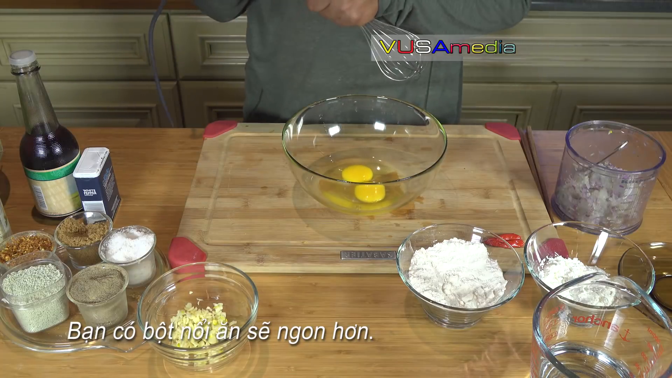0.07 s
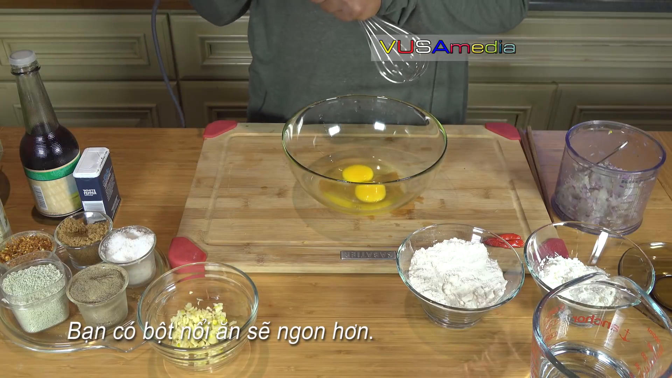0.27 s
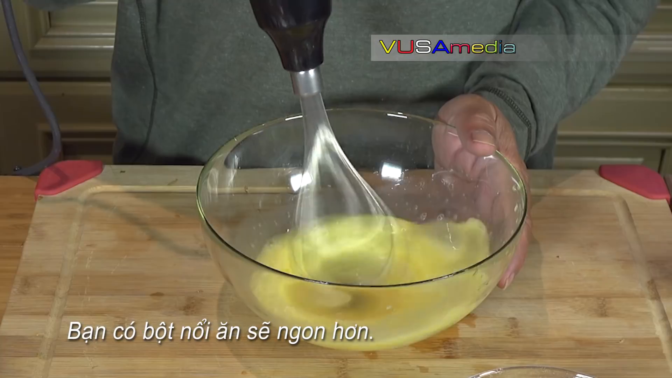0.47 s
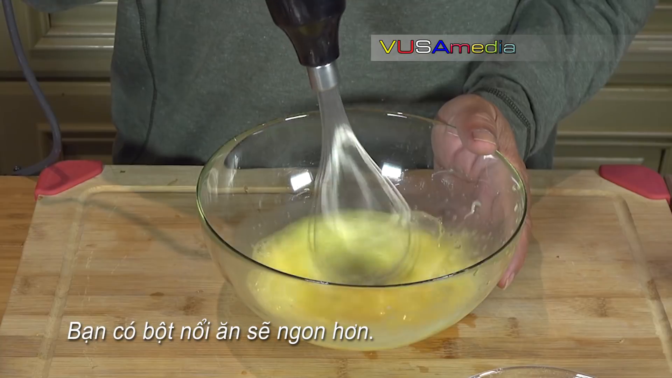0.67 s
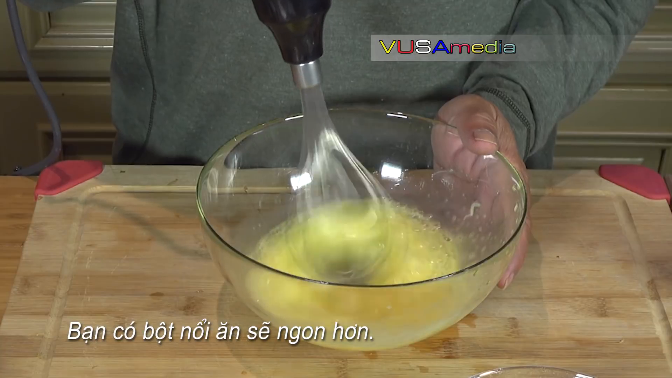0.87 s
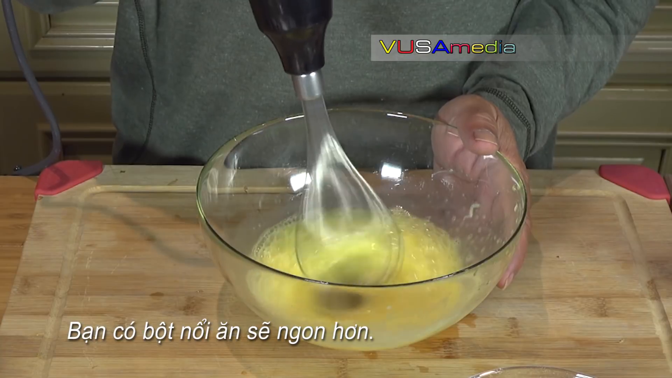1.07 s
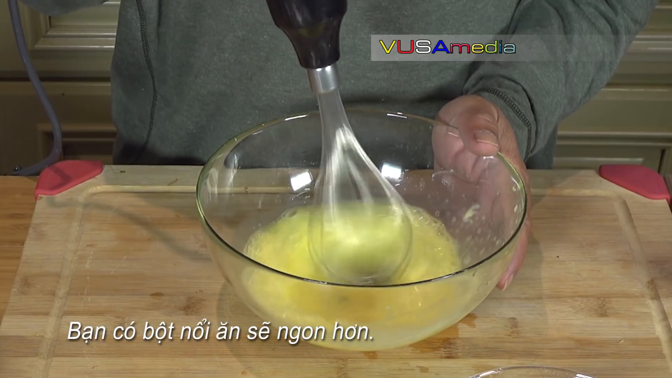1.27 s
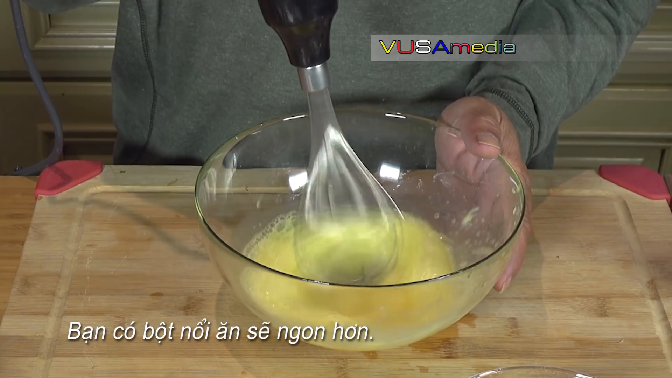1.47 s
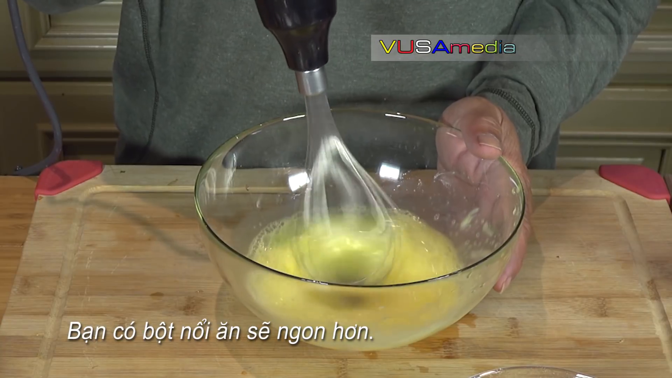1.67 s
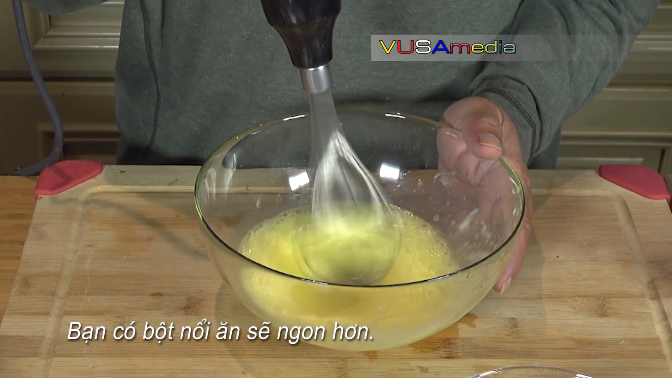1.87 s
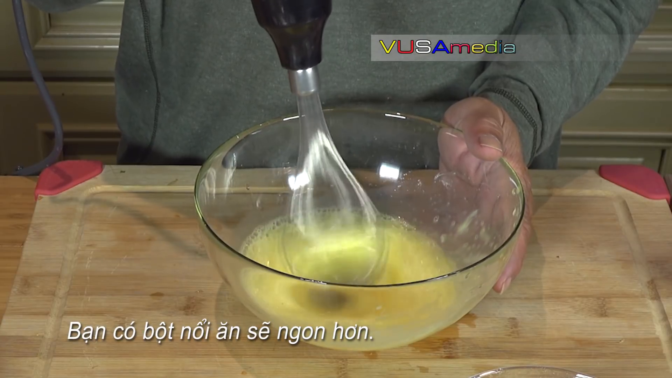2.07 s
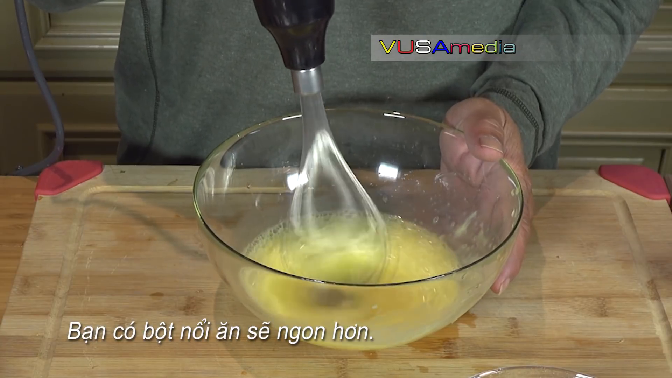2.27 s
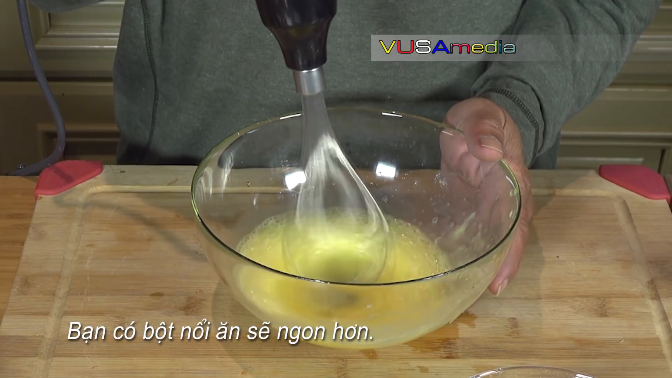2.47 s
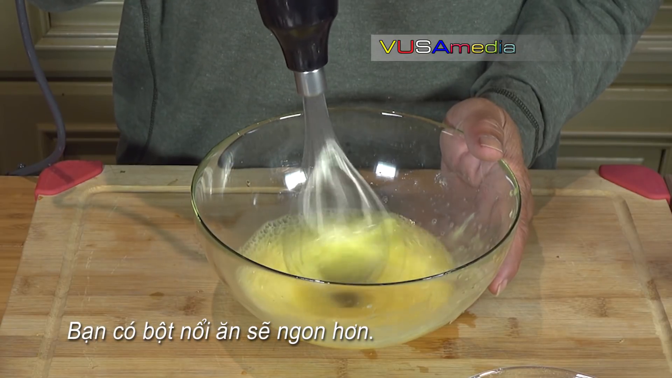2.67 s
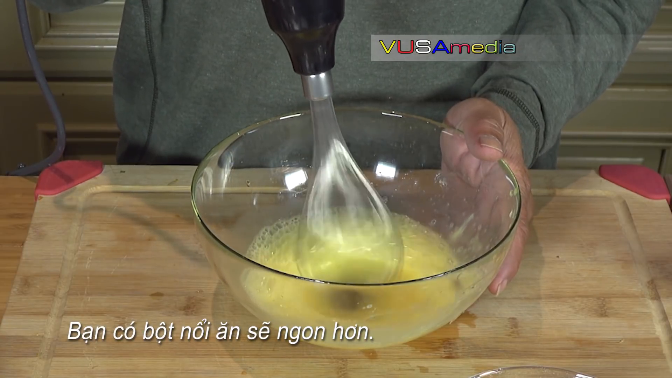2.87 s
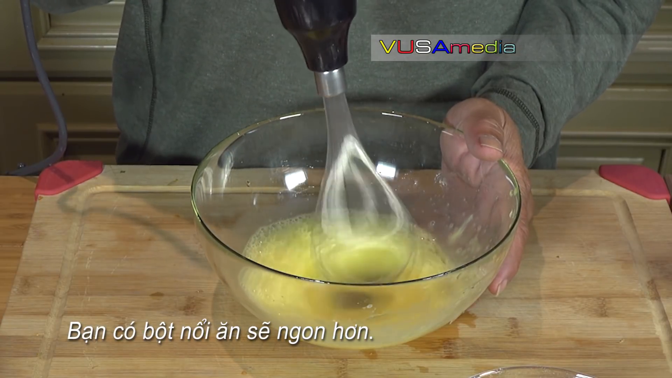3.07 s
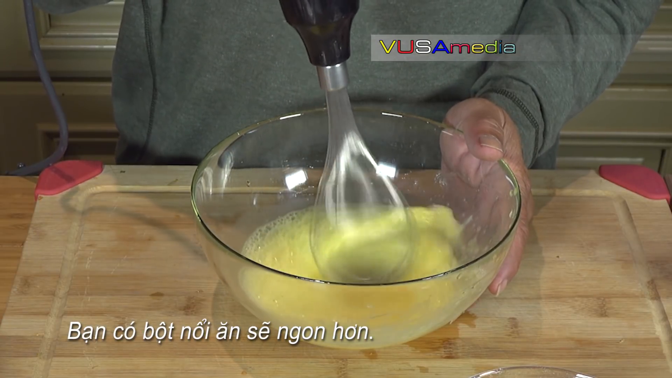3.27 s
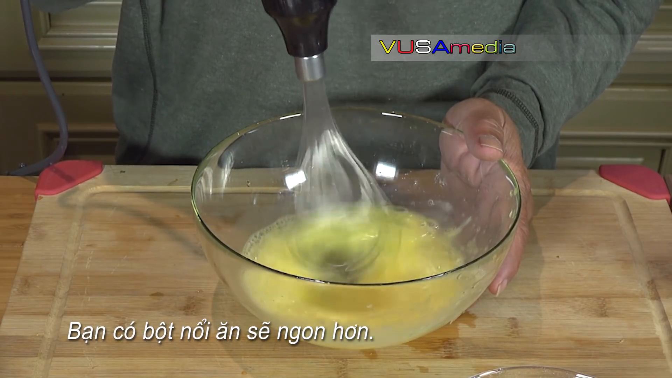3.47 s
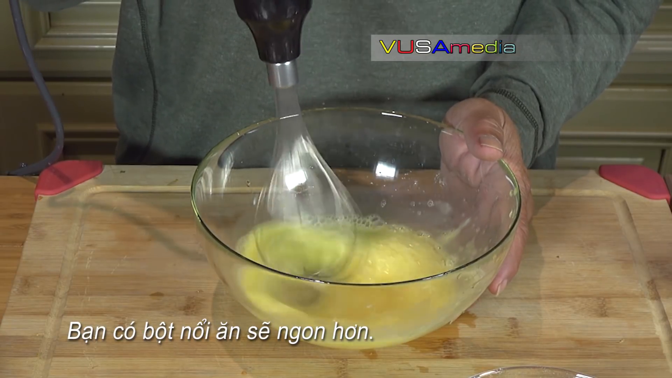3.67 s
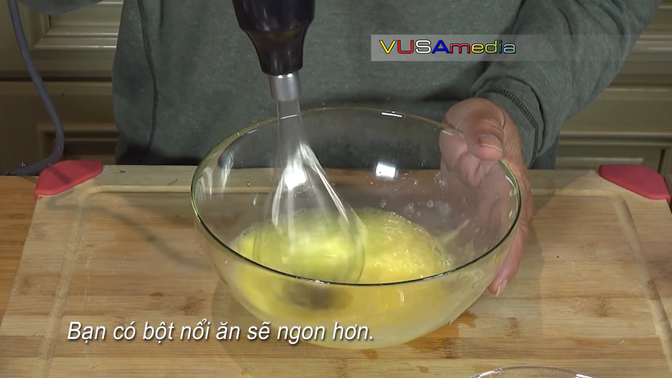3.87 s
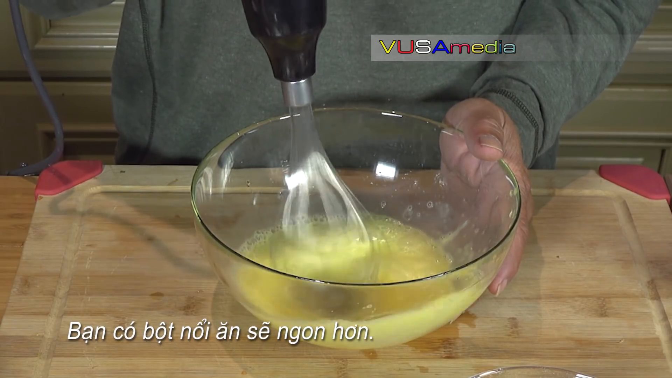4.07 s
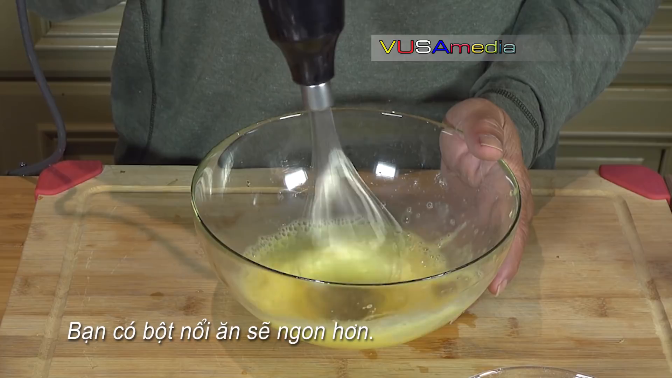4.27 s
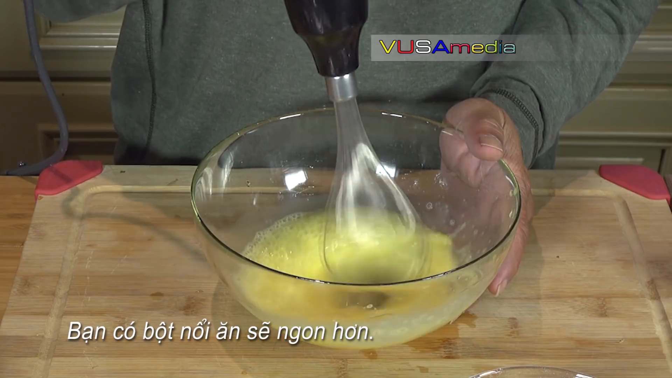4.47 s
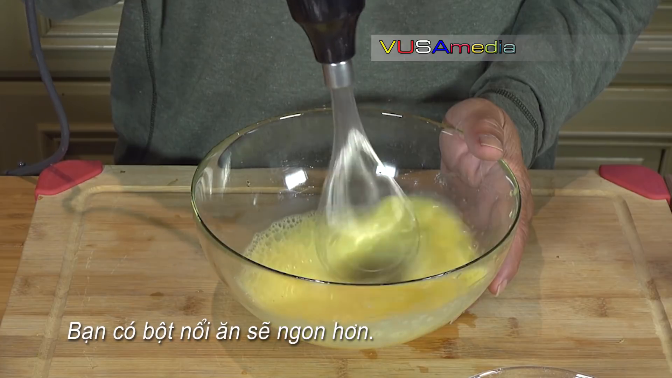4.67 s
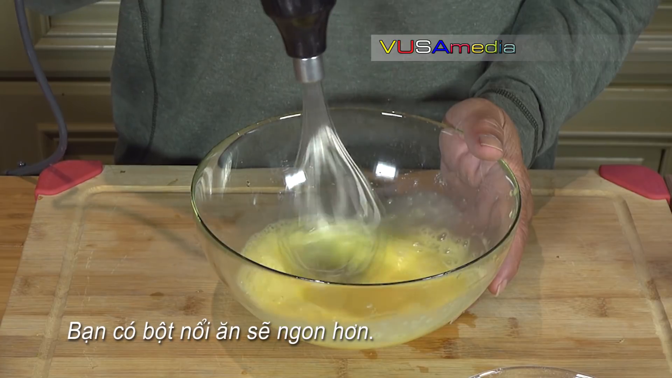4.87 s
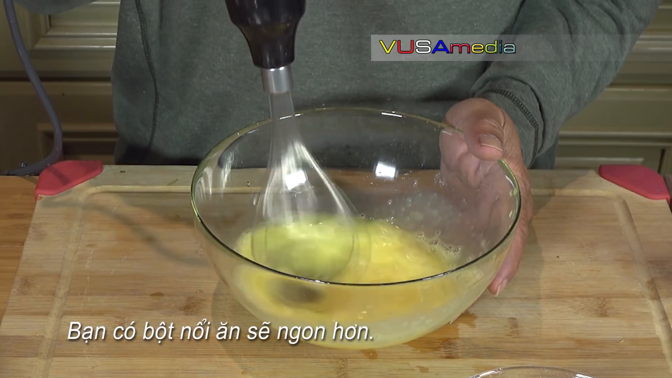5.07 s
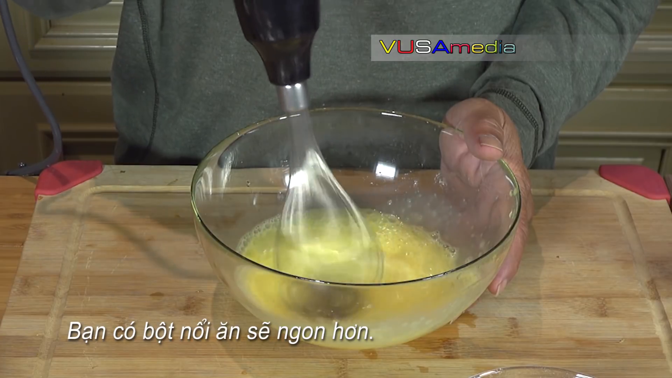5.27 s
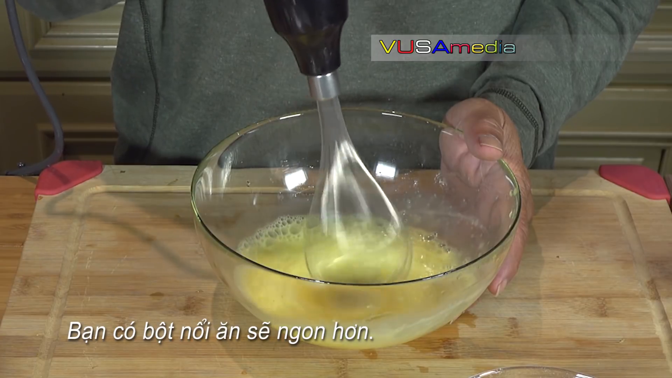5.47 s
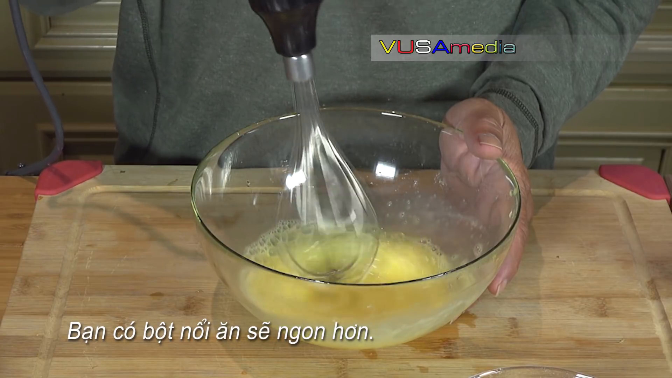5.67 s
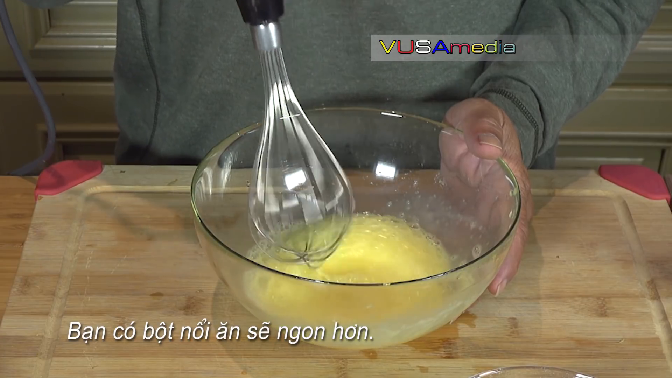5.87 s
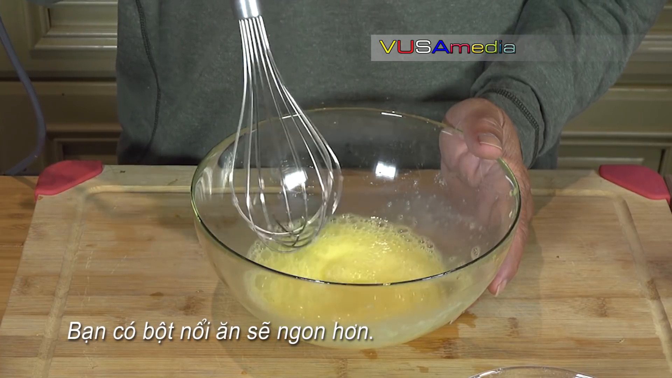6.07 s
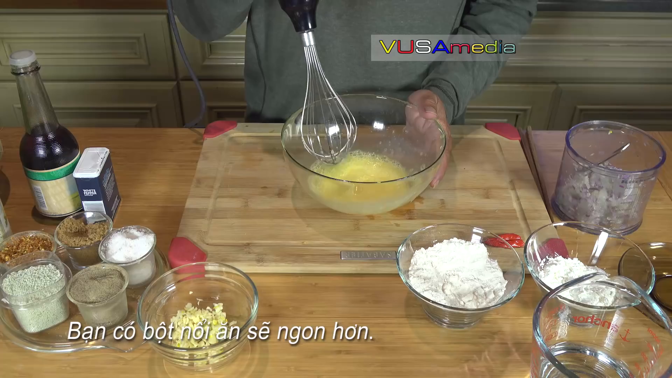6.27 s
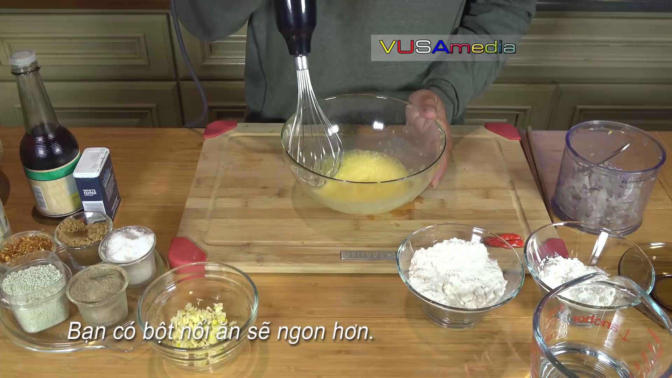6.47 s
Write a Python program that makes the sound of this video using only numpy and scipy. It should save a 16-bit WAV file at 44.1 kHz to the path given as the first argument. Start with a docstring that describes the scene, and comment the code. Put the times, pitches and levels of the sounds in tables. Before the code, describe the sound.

A quick cluster of latching clicks with a short metallic ring comes first. Then an electric whisk whirs steadily, buzzing and fluttering as wires beat eggs in a glass bowl, with tiny squeaks and dull bumps. The drive slows for a moment, picks up again, and finally slides down in pitch to a stop. Close, bright and fairly dry, with slight kitchen reflections and faint low hum.

```python
"""A whisk attachment snaps onto a hand blender in a kitchen: short noise bursts and ringing modes.
The motor then runs up and beats eggs in a glass bowl: ten wires fling shaped noise on every turn,
while gear teeth rattle a resonant housing and the drive whines; wires squeak, the bowl bumps.
The motor sags once as the button is let go, picks up again and finally coasts to a stop.
Soft room tone with hum lies beneath, quieter from when the whirr is heard until just after the stop."""
import sys
import numpy as np
from scipy import signal
from scipy.fft import rfft, irfft
from scipy.io import wavfile
from scipy.ndimage import uniform_filter1d

SR = 44100
rng = np.random.default_rng(int(sys.argv[2]) if len(sys.argv) > 2 else 0)


def to_wav(s):
    """Save 16-bit WAV."""
    ch = np.atleast_2d(s).T  # columns
    pcm = np.round(np.clip(ch, -1, 1) * 32767)  # PCM
    wavfile.write(sys.argv[1], SR, pcm.astype(np.int16))


N = 287532
T = np.arange(N) / SR
FULL_SPEED_TURNS_PER_S = 13.83


def from_db(db):
    """Decibels to gain."""
    return 10 ** (np.asarray(db) / 20)


def rms_one(x):
    """Scale to unit power."""
    return x / np.sqrt(np.mean(x ** 2) + 1e-20)


def in_time(rows):
    """Each column of a curve, interpolated sample by sample."""
    s, *columns = np.transpose(rows)
    return [np.interp(T, s, c) for c in columns]


def drift(rate_hz):
    """Smooth random drift, unit power, with rate_hz new values per second."""
    return rms_one(np.interp(T * rate_hz, np.arange(8000), rng.standard_normal(8000)))


def coloured(x, spectrum):
    """Weight x by a spectrum, interpolated over log frequency; unit power."""
    hz, db = np.transpose(spectrum)
    bins_hz = np.maximum(np.fft.rfftfreq(N, 1 / SR), 1)
    gain = from_db(np.interp(np.log(bins_hz), np.log(hz), db))
    return rms_one(irfft(rfft(x) * gain, N))


def resonate(x, hz, width_hz):
    """Two-pole resonance, about unit gain at its peak."""
    r = np.exp(-np.pi * width_hz / SR)
    zeros = np.array([1, 0, -1]) * (1 - r * r) / 2
    poles = [1, -2 * r * np.cos(2 * np.pi * hz / SR), r * r]
    return signal.lfilter(zeros, poles, x + 1e-18)


def band(x, low_hz, high_hz):
    """Causal band-pass."""
    edges_hz = [low_hz, min(high_hz, SR / 2 - 100)]
    return signal.sosfilt(signal.butter(2, edges_hz, "band", fs=SR, output="sos"), x)


def passings(position):
    """Samples at which a position passes a whole number, and that number."""
    at = np.flatnonzero(np.diff(np.floor(position)) > 0) + 1
    return at, position[at].astype(int)


def grains(per_s, spread_db):
    """Random tiny impacts of uneven size; unit power."""
    hit = rng.random(N) < per_s / SR
    size = rng.standard_normal(N) * from_db(spread_db * rng.standard_normal(N))
    return rms_one(hit * size)


def dulled(x, speed, corner_hz):
    """Treble of a contact shrinks in proportion to the speed."""
    dull = signal.sosfiltfilt(signal.butter(2, corner_hz, fs=SR, output="sos"), x)
    return dull + speed / FULL_SPEED_TURNS_PER_S * (x - dull)


def burst(db, low_hz, high_hz, decay_s):
    """Brief contact: decaying noise in one band, db at its peak."""
    t = T[:SR // 3]
    noise = band(rng.standard_normal(len(t)) * np.exp(-t / decay_s), low_hz, high_hz)
    return from_db(db) * noise / np.abs(noise).max()


def ringing(db, modes):
    """Decaying modes of a struck part."""
    t = T[:SR // 3]
    out = np.zeros(len(t))
    for hz, mode_db, t60_s in modes:
        decay = from_db(db + mode_db - 60 * t / t60_s)
        out += decay * np.sin(2 * np.pi * (hz * t + rng.random()))
    return out


def add(out, s, sound):
    """Mix a sound in at time s."""
    at = int(s * SR)
    out[at:at + len(sound)] += sound[:N - at]


# button: (pressed [s], released [s])
BUTTON_PRESSES = [(.444, 3.714), (4.025, 5.405)]
SPIN_UP_S = .025  # time constant
FRICTION_TURNS_PER_S2, EGG_DRAG_S = 12.96, 1.314  # dry friction; time constant of the drag


def whisk_speed():
    """Turns per second: exponential run-up on each press, then friction and drag brake the whisk."""
    speed = np.zeros(N)
    drag_floor = FRICTION_TURNS_PER_S2 * EGG_DRAG_S
    for pressed_s, released_s in BUTTON_PRESSES:
        lacking = FULL_SPEED_TURNS_PER_S - speed[int(pressed_s * SR)]
        since_press_s = np.maximum(T - pressed_s, 0)
        driven = FULL_SPEED_TURNS_PER_S - lacking * np.exp(-since_press_s / SPIN_UP_S)
        slowing = np.exp((released_s - T) / EGG_DRAG_S)
        coasting = (FULL_SPEED_TURNS_PER_S + drag_floor) * slowing - drag_floor
        speed = np.select([T < pressed_s, T < released_s], [speed, driven], np.maximum(coasting, 0))
    return speed


# how hard the whisk works: (time [s], level [dB])
WORK = [(0.48, -33), (0.6, -34.5), (0.9, -32.5), (1.1, -33.5), (1.9, -31.5), (2.2, -33.5), (2.75, -35),
        (3.4, -35.5), (3.72, -31.0), (4.08, -31.5), (4.2, -36.5), (4.4, -33), (4.65, -34.0), (4.85, -31.5),
        (5.2, -32.5), (5.31, -39), (5.42, -32)]
USUAL_WORK_DB = -33
# below this speed the wires only stir; softness of the change
FLING_TURNS_PER_S, FLING_SOFTNESS_TURNS_PER_S = 8.22, 0.36


def loudness(speed, usual_db, work_share, speed_power, stirring_loss_db):
    """Layer level in dB: follows work and a power of speed, drops once the whisk only stirs."""
    work_db, = in_time(WORK)
    speed_db = 20 * np.log10(speed / FULL_SPEED_TURNS_PER_S + 1e-6)
    stirring = .5 - .5 * np.tanh((speed - FLING_TURNS_PER_S) / FLING_SOFTNESS_TURNS_PER_S)
    worked_db = usual_db + work_share * (work_db - USUAL_WORK_DB)
    return worked_db + speed_power * speed_db - stirring_loss_db * stirring


# how far off centre the whisk is held: (time [s], scale of the throb [dB])
LEAN = [(.6, 8.5), (1.3, 8), (2.6, 5), (3.35, 6), (3.95, 15), (4.2, 5), (4.75, 6), (5.05, 12.5), (5.4, 7.5),
        (5.63, 6.5), (5.8, 4)]


def off_centre_dig(turn):
    """The off-centre whisk digs in once per turn and loads the gears; dB."""
    throb_db, = in_time(LEAN)
    return throb_db * (np.exp(1.01 * (np.cos(2 * np.pi * (turn - .1)) - 1)) - .48)


# unequally bent wires, in order round the whisk, relative levels:
# (slosh [dB], spray [dB], ping frequency [Hz], ping [dB])
WIRES = [(-4.5, 7.5, 1085, -8.5), (-1.5, 3, 3020, -6.5), (-2.5, 9.5, 8400, -15), (2.5, 7.5, 12100, -17),
         (-3.5, 14, 2100, -17), (2.5, 9.5, 8150, -9.5), (0, 10.5, 5700, -10), (0.5, 10, 6350, -6.5),
         (-1.5, -0.5, 6300, -15.5), (-1, 10.5, 1510, -7.5)]
# egg slapped by the wires: (frequency [Hz], relative density [dB per Hz])
SLOSH_SPECTRUM = [(40, -14), (150, -14.5), (300, -9), (500, -5.5), (700, -1.5), (1000, -3.5), (1350, 3.5),
                  (1800, -0.5), (2500, -4), (3500, -5.5), (6000, -14.5), (16000, -47)]
# fine spray: (frequency [Hz], relative density [dB per Hz])
SPRAY_SPECTRUM = [(1000, -26), (3000, -4), (4700, 3.5), (5400, -6), (6200, 2), (7100, 1.5), (7650, -2),
                  (8600, -7.5), (9500, 2.5), (10800, 1), (12300, 6), (13300, -2.5), (14200, 1), (16000, -8)]


def egg(turn, speed, slosh_db, spray_db):
    """Each stroke throws up coarse slaps and a mist of droplets; slow wires slap more dully."""
    wire_slosh_db, wire_spray_db, _, _ = np.transpose(WIRES)
    slap_strokes = wire_strokes(turn, wire_slosh_db, decay_s=0.0025, uneven_db=3.5, churn=0.96)
    slaps = coloured(grains(per_s=9000, spread_db=0), SLOSH_SPECTRUM) * slap_strokes
    slaps = dulled(slaps, speed, corner_hz=2700)
    drop_strokes = wire_strokes(turn, wire_spray_db, decay_s=0.0022, uneven_db=3.5, churn=0.35)
    drops = coloured(rng.standard_normal(N), SPRAY_SPECTRUM) * drop_strokes
    return from_db(slosh_db) * slaps + from_db(spray_db) * drops


def wire_strokes(turn, wire_db, decay_s, uneven_db, churn):
    """Every wire ploughs into the egg: a quick swell that dies away, above a steady churn."""
    at, wire = passings(turn * len(WIRES) + 0.26)
    hits = np.zeros(N)
    hits[at] = from_db(wire_db[wire % len(WIRES)] + uneven_db * rng.standard_normal(len(at)))
    r = np.exp(-1 / (decay_s * SR))
    splash = signal.lfilter([1], [1, -2 * r, r * r], hits + 1e-18)
    return rms_one(rms_one(splash) + churn)


def wire_pings(turn):
    """Each wire pings briefly near its own pitch as it comes round, damped by the egg."""
    at, wire = passings(turn * len(WIRES) + .25)
    out, t = np.zeros(N + SR), T[:SR // 30]
    swell = t / 0.0023 * np.exp(1 - t / 0.0019)
    chances = rng.standard_normal((len(at), 3))
    for start, k, (strength, detune, phase) in zip(at, wire, chances):
        _, _, hz, db = WIRES[k % len(WIRES)]
        tone = np.sin(2 * np.pi * (hz * (1 + 0.024 * detune) * t + phase))
        out[start:start + len(t)] += from_db(db + 3.4 * np.tanh(strength)) * swell * tone
    return out[:N]


def gearbox(turn, speed, gear_db, whine_db, dig_db):
    """Rattle and whine; under load the tones that meet the main housing resonance swell most."""
    rattle = from_db(gear_db + 0.99 * dig_db + drift(60)) * gear_rattle(turn, speed)
    tones = from_db(whine_db) * gear_whine(turn)
    singing = from_db(5.5 + 1.9 * dig_db) * resonate(tones, hz=4400, width_hz=380)
    return rattle + from_db(0.82 * dig_db) * tones + singing


TEETH = 108  # gear meshings per whisk turn
SOFT_KNOCK_HZ = 5000  # treble above this fades with the speed
# resonances of the gear housing: (frequency [Hz], width [Hz], relative level [dB])
HOUSING = [(1345, 150, -7.5), (3080, 420, -16), (4150, 310, 3.5), (4360, 130, 2.5), (6020, 320, -7.5),
           (8020, 146, -2), (9130, 180, -5)]


def gear_rattle(turn, speed):
    """Teeth knock into the housing, which rings; slow knocks are duller."""
    at, tooth = passings(TEETH * turn + .07 * drift(700))
    wear = rng.standard_normal(TEETH)  # each tooth's own error, met again on every turn
    knocks = np.zeros(N)
    knocks[at] = 0.5 + 0.12 * wear[tooth % TEETH] + 1.05 * rng.standard_normal(len(at))
    force = rms_one(knocks) + 0.41 * grains(per_s=9000, spread_db=4)
    rattle = sum(from_db(db) * resonate(force, hz, width_hz) for hz, width_hz, db in HOUSING)
    return dulled(rms_one(rattle), speed, SOFT_KNOCK_HZ)


# tones of the drive: (order [cycles per whisk turn], relative level [dB])
DRIVE_ORDERS = [(10, -25), (48, -12), (60, -12.5), (70, -8.5), (78, -12.5), (100, -14), (108, -1),
                (115, -6.5), (123, -14), (216, -6.5), (324, -6), (432, -15.5), (540, -18), (648, -8.5)]


def gear_whine(turn):
    """Sines locked to the whisk angle; they waver as the whisk drags."""
    angle = turn + .0009 * np.sin(2 * np.pi * (turn - .07)) + .0004 * drift(35)
    out = np.zeros(N)
    for order, db in DRIVE_ORDERS:
        level = from_db(db + 2.9 * drift(22)) * np.sqrt(2)
        out += level * np.sin(2 * np.pi * (order * angle + rng.random()))
    return out


# attachment latching: (time [s], thud [dB], snap [dB], tick [dB], whisk ring [dB])
LATCH_CONTACTS = [(0.07, -38, -28, -55, -69), (0.113, -18, -25, -37, -69), (0.115, -31, -9, -19, -57),
                  (0.152, -17, -27, -21.5, -24), (.160, -40, -42.5, -38, -52), (.179, -32.5, -37, -34, -48),
                  (.189, -24, -41.5, -37, -37), (.193, -33, -30, -26, -42), (0.235, -47, -50, -39, -70),
                  (0.3, -61, -57, -36.5, -68), (.312, -25, -35.5, -41, -52)]
# spring catch and whisk: (frequency [Hz], relative level [dB], t60 [s])
CATCH_MODES = [(1880, -8, .035), (2180, -4, 0.038), (2350, -6, .04), (3830, -7, .03), (3580, -4, 0.04),
               (4090, 3, 0.022), (6340, -15.5, .04), (6500, -16.5, .04)]
# whisk and its coupling: (frequency [Hz], relative level [dB], t60 [s])
WHISK_MODES = [(500, -8, .06), (1693, -5, .08), (1769, -4, .085), (1860, -7, .05), (3468, -9, .085),
               (3560, -9, .07), (3650, -13, .06), (6400, -20, .08), (6900, -16, .05)]
CATCH_RING_DB, CATCH_RING_DB_PER_SNAP_DB = -5.5, 1.47


def latch():
    """The catch snaps home with a short crack and a knock in the handle; it and the whisk ring on."""
    out = np.zeros(N)
    for s, thud_db, snap_db, tick_db, whisk_db in LATCH_CONTACTS:
        knock = burst(thud_db, 350, 960, decay_s=0.001) + burst(thud_db - 15, 74, 420, decay_s=0.0063)
        crack = burst(snap_db, 1600, 2640, decay_s=0.0011) + burst(tick_db, 3000, 9500, decay_s=0.0022)
        catch_db = CATCH_RING_DB + CATCH_RING_DB_PER_SNAP_DB * snap_db
        add(out, s, knock + crack + ringing(catch_db, CATCH_MODES) + ringing(whisk_db, WHISK_MODES))
    return out


# a wire squeaks on the glass: (time [s], frequency [Hz], peak [dB])
SQUEAKS = [(2.238, 6330, -27), (2.365, 5830, -26.5), (2.447, 6300, -28), (2.582, 5780, -27),
           (2.807, 6260, -31), (2.950, 6320, -28), (3.239, 6400, -24.5)]
# the gear housing sings out: (time [s], frequency [Hz], peak [dB])
FLARES = [(.595, 4510, -24.5), (.955, 4470, -28), (1.245, 4500, -21), (3.63, 4510, -21),
          (3.777, 4240, -21.5), (3.965, 4390, -25.5), (4.082, 4250, -20), (5.02, 4520, -24.5),
          (5.165, 4540, -21.5), (5.765, 4230, -38)]


def squeaks_and_flares():
    """Steel slips briefly on wet glass; the housing sings a little longer."""
    return swells(SQUEAKS, width_s=0.0036, waver_rad=0.6) + swells(FLARES, width_s=0.0058, waver_rad=0.83)


def swells(rows, width_s, waver_rad):
    """Short phase-wavering tones that swell and fade."""
    phase = waver_rad * drift(350)
    out = np.zeros(N)
    for s, hz, db in rows:
        envelope = np.exp(-np.minimum(((T - s) / width_s) ** 2, 50))
        out += from_db(db) * envelope * np.sin(2 * np.pi * hz * T + phase)
    return out


# the whisk bumps the bowl against the board: (time [s], thump peak [dB], scrape peak [dB])
BUMPS = [(2.289, -37, -23), (3.236, -36, -42.5), (3.758, -36, -18), (3.882, -33.5, -22),
         (4.001, -39, -23.5), (4.043, -41.5, -28.5), (4.341, -41, -37), (5.17, -39, -30)]


def bumps():
    """A dull thump through the board and a scrape of the wires."""
    out = np.zeros(N)
    for s, thump_db, scrape_db in BUMPS:
        thump = burst(thump_db, 48, 590, decay_s=0.0064)
        add(out, s, thump + burst(scrape_db, 570, 14000, decay_s=0.017))
    return out


def kitchen(x, t60_s, wet_db):
    """Short diffuse reflection from cupboards and walls: decaying noise as impulse response."""
    t = T[:SR // 2]
    tail = band(rng.standard_normal(len(t)), 170, 9000) * from_db(-60 * t / t60_s) * (t > .004)
    return x + from_db(wet_db) * signal.fftconvolve(x, tail / np.sqrt(np.sum(tail ** 2)))[:N]


# room tone: (frequency [Hz], relative density [dB per Hz])
ROOM_SPECTRUM = [(15, -43.5), (25, -16), (166, -12.5), (373, -21), (427, -21), (863, -29), (936, -28.5),
                 (1070, -32.5), (2840, -44), (5140, -45.5), (5730, -47.5), (8590, -48), (12500, -46),
                 (16000, -57.5)]
# appliance hum: (frequency [Hz], level against ROOM_DB [dB])
HUM = [(143, -6), (188, -8)]
ROOM_DB, ROOM_DIP_DB = -49.5, 9.5
DIP_START_S, DIP_END_S = .47, 6.275


def room_tone():
    """Soft rumble with a wavering hum; its level sinks and comes back near the end."""
    hum = np.zeros(N)
    for hz, db in HUM:
        hum += from_db(db) * np.sqrt(2) * np.sin(2 * np.pi * hz * T + 0.72 * drift(14))
    rumble = from_db(-2.0) * coloured(rng.standard_normal(N), ROOM_SPECTRUM)
    dipped = uniform_filter1d(1. * (T > DIP_START_S) * (T < DIP_END_S), size=600)
    return from_db(ROOM_DB - ROOM_DIP_DB * dipped) * (rumble + hum)


START_TURN, WHIRR_START_S = .371, .468
LAST_TURNS_PER_S = .8  # beating and gearbox fade out below this speed


def scene():
    """Whisk speed sets the levels; its angle drives both the strokes in the egg and the gears."""
    speed = whisk_speed()
    turn = START_TURN + np.cumsum(speed) / SR
    slosh_db = loudness(speed, usual_db=-35.5, work_share=0.28, speed_power=0.99, stirring_loss_db=1.5)
    spray_db = loudness(speed, usual_db=-32.73, work_share=0.86, speed_power=1.52, stirring_loss_db=11)
    gear_db = loudness(speed, usual_db=-35.5, work_share=0.6, speed_power=0.78, stirring_loss_db=6)
    whine_db = loudness(speed, usual_db=-45.5, work_share=0.41, speed_power=0.36, stirring_loss_db=13)
    dig_db = off_centre_dig(turn)
    beating = egg(turn, speed, slosh_db + 0.5 * dig_db, spray_db + 0.5 * dig_db)
    pings = from_db(spray_db + 7.73) * wire_pings(turn)
    gears = gearbox(turn, speed, gear_db, whine_db, dig_db)
    running = (T > WHIRR_START_S) * np.minimum(speed / LAST_TURNS_PER_S, 1)
    blender = running * (beating + pings + gears) + squeaks_and_flares() + bumps()
    return (kitchen(blender + latch(), t60_s=0.35, wet_db=-16) + room_tone())[None]


CUTOFF_HZ = 15900


def record(dry):
    """Steep elliptic low-pass."""
    return signal.sosfilt(signal.ellip(12, .1, 80, CUTOFF_HZ, fs=SR, output="sos"), dry)


dry = scene()
out = record(dry)
to_wav(out)
```